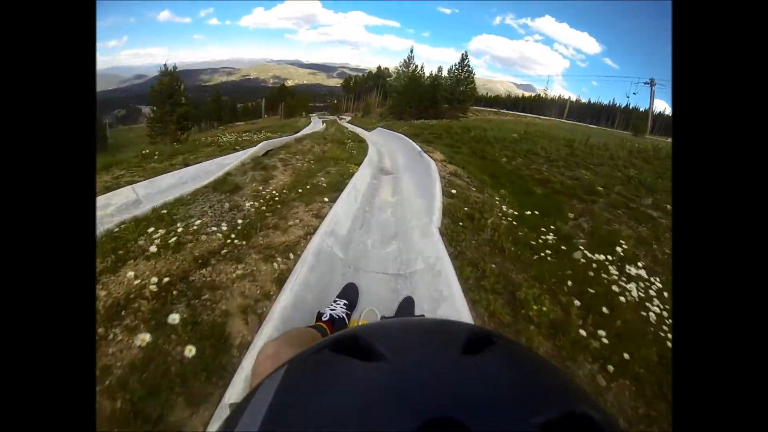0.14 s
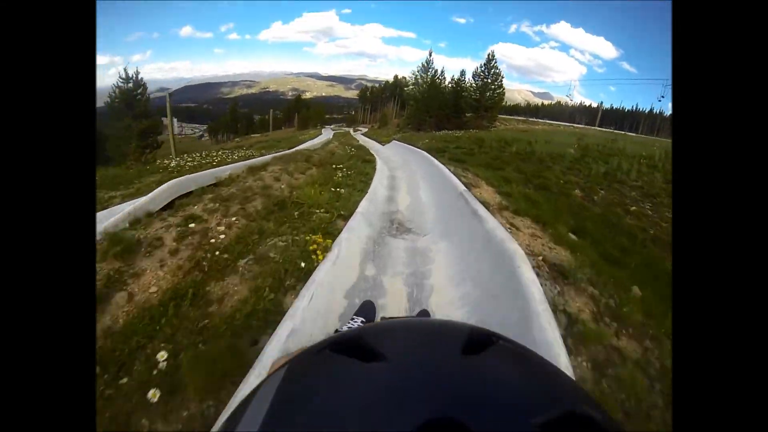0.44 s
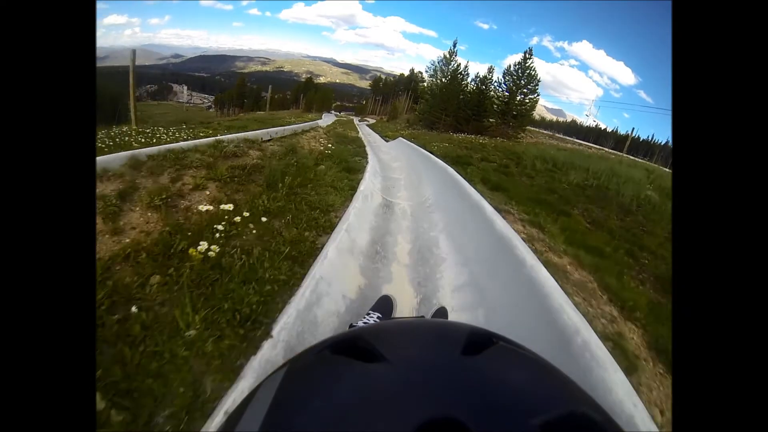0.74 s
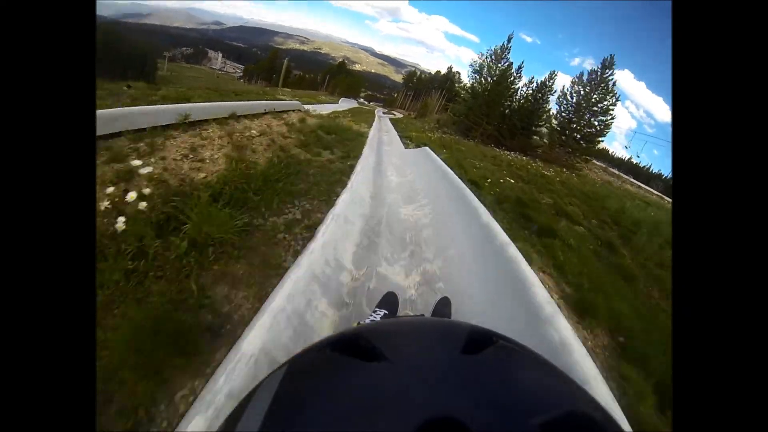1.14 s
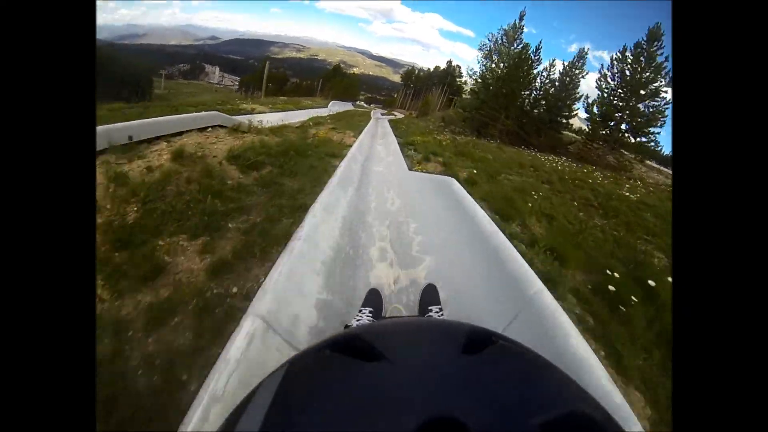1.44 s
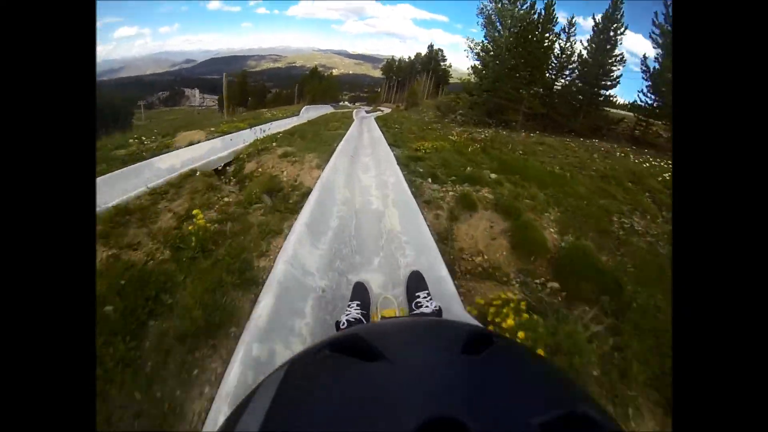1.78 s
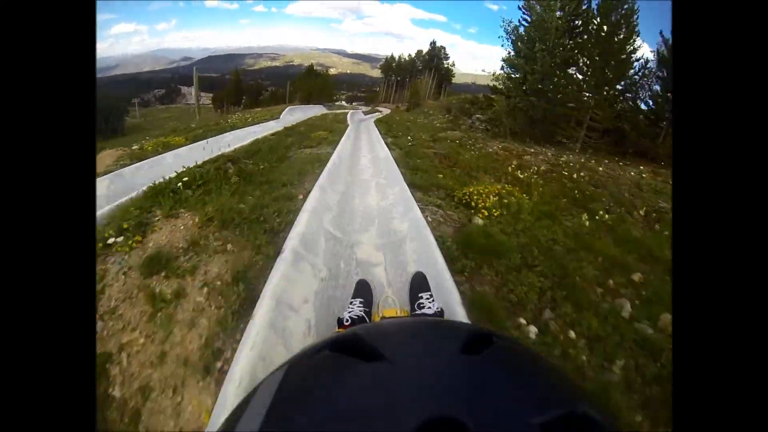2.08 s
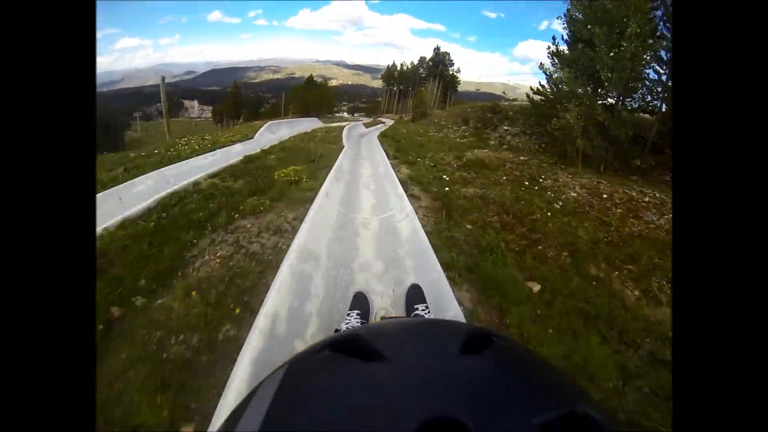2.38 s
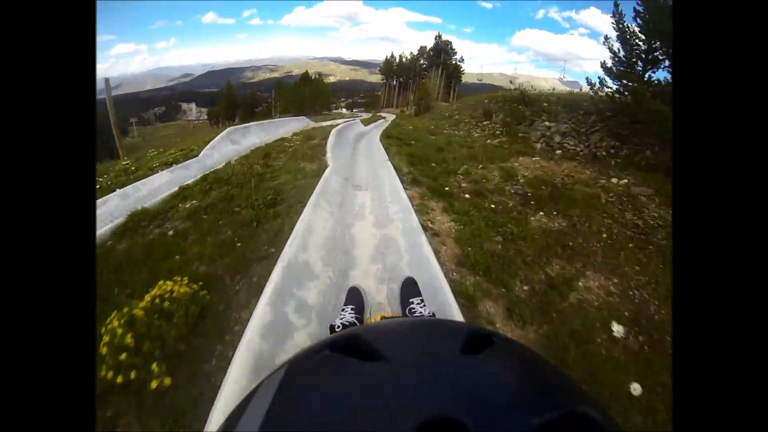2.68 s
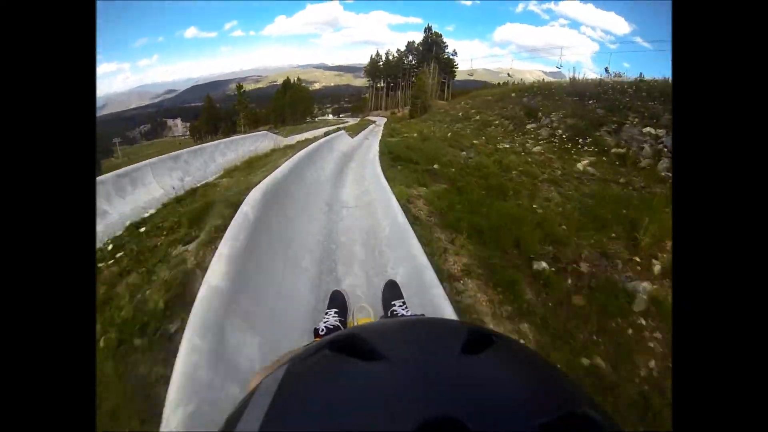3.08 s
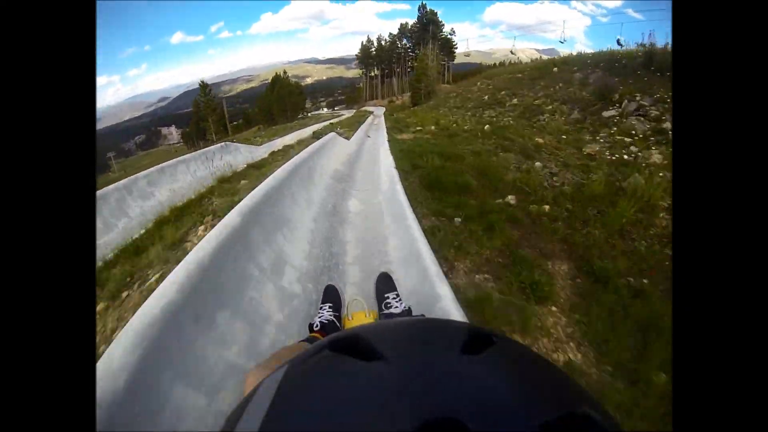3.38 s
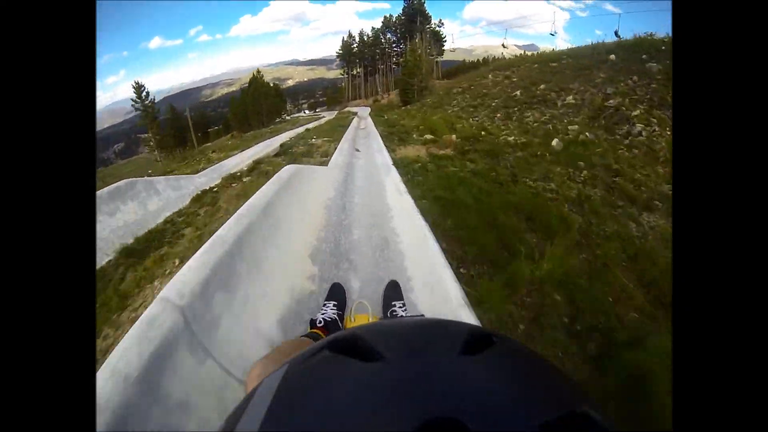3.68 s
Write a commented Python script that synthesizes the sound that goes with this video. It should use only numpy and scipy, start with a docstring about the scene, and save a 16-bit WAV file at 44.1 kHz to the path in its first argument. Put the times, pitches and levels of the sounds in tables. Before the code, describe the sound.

A wheeled sled rumbles along a concrete chute, with bumps and buffeting wind.

```python
"""A wheeled sled roars down a concrete chute on an open hillside, heard from the rider's helmet.
Grit under the wheels excites broadband rolling noise, and the uneven track shakes the shell into a rumble.
Impacts ring damped modes: bumps thump the shell, joints clack the chassis, loose fittings tick.
Wind buffets the microphone over a faint electrical whine.
Near the end something brushes along the banked wall with a short hiss."""
import sys
import numpy as np
from scipy import signal
from scipy.fft import rfft, irfft, next_fast_len
from scipy.io import wavfile
from scipy.ndimage import uniform_filter1d

SR = 44100
rng = np.random.default_rng(int(sys.argv[2]) if len(sys.argv) > 2 else 0)


def file_out(sig):
    """Save sig as 16-bit WAV at sys.argv[1]."""
    # one column per channel
    cols = np.atleast_2d(sig).T
    # limit, then scale
    lim = np.clip(cols, -1, 1)
    pcm = np.round(lim * 32767).astype(np.int16)
    wavfile.write(sys.argv[1], SR, pcm)


N = 168903
FLUTTER_HZ = 14   # bandwidth of the random level flutter in roar and rumble


def from_db(db):
    """Decibels to amplitude ratio."""
    return 10 ** (np.asarray(db) / 20)


def rms_one(x):
    """Normalisation to unit rms."""
    return x / np.sqrt(np.mean(x ** 2) + 1e-20)


def in_time(rows):
    """Linear interpolation of (time_s, value) rows at every sample."""
    time_s, value = np.transpose(rows)
    return np.interp(np.arange(N) / SR, time_s, value)


def coloured(x, spectrum):
    """Spectral shaping by (frequency_hz, density_db) rows, falling 12 dB an octave outside; unit rms."""
    hz, db = np.transpose(spectrum)
    size = next_fast_len(N)
    bin_hz = np.maximum(np.fft.rfftfreq(size, 1 / SR), 1)
    skirts = np.minimum(1, bin_hz / hz[0]) ** 2 * np.minimum(1, hz[-1] / bin_hz) ** 2
    gain = from_db(np.interp(np.log(bin_hz), np.log(hz), db))
    return rms_one(irfft(rfft(x, size) * skirts * gain, size)[:N])


def low_pass(x, hz, order=2):
    """Butterworth low-pass filter."""
    return signal.sosfilt(signal.butter(order, hz, fs=SR, output="sos"), x + 1e-18)


def band_below(x, hz):
    """Zero-phase low-pass: filtering forwards and backwards cancels the delay."""
    forwards = low_pass(x, hz, order=4)
    return low_pass(forwards[::-1], hz, order=4)[::-1]


def drift(hz):
    """Slow random fluctuation: low-passed noise of unit rms."""
    pole = np.exp(-2 * np.pi * hz / SR)
    return rms_one(signal.lfilter([1], [1, -2 * pole, pole * pole], rng.standard_normal(N + SR))[SR:])


def ring(x, hz, t60_s):
    """Damped resonator: a unit impulse starts a decaying sine of amplitude 1."""
    radius, angle = np.exp(-np.log(1000) / (t60_s * SR)), 2 * np.pi * hz / SR
    return signal.lfilter([0, np.sin(angle)], [1, -2 * radius * np.cos(angle), radius ** 2], x + 1e-18)


def modal_response(force, modes):
    """Superposition of damped modes (pitch_hz, level_db, t60_s), alternating in sign."""
    return sum(from_db(db) * ring(force, hz, t60_s) * (-1) ** k for k, (hz, db, t60_s) in enumerate(modes))


def evened(x, span_s):
    """Division by the running rms takes the slow swings out of a noise."""
    return x / np.sqrt(uniform_filter1d(x ** 2, int(span_s * SR)) + 1e-6)


def add(out, start_s, x):
    """Superpose a short sound at its start time."""
    i = int(start_s * SR)
    out[i:i + len(x)] += x[:N - i]


def whine():
    """Amplitude modulation: a thin electrical tone and its octave flutter evenly as their phase wanders."""
    # pitch_hz, level_db
    partials = [(6435, -92.5), (12870, -102)]
    depth, rate_hz = 0.94, 50
    t = np.arange(N) / SR
    flutter = 1 + depth * np.sin(2 * np.pi * rate_hz * t)
    wander = 1.3 * drift(hz=40)
    return flutter * sum(from_db(db) * np.sin(2 * np.pi * hz * t + wander) for hz, db in partials)


def wall_brush():
    """Friction noise: a light sliding contact bites in and hisses for about a quarter of a second."""
    # envelope of the contact: time_s, level_db
    envelope = [(3.40, -85), (3.47, -66), (3.533, -70), (3.541, -57), (3.64, -59.5), (3.745, -60),
                (3.785, -67), (3.82, -80)]
    # spectrum of the hiss: frequency_hz, density_db
    spectrum = [(1500, -8.5), (2800, 0), (3900, -2.5), (4900, -0.5), (6300, -6), (7500, -12.5), (8700, -21),
                (10500, -36.5), (13000, -41.5)]
    gain_db, flutter_db = -3.5, 0.7
    level_db = gain_db + in_time(envelope) + flutter_db * drift(hz=40)
    return from_db(level_db) * coloured(rng.standard_normal(N), spectrum)


def wind_buffeting():
    """Turbulence: the pressure of passing eddies throbs on the microphone."""
    # envelope of the gusts: time_s, level_db
    gusts = [(0.0, -35), (0.29, -30.5), (0.33, -29), (0.56, -31), (0.63, -35.5), (0.70, -27), (0.79, -27.5),
             (0.85, -37.5), (0.98, -34.5), (1.16, -29.5), (1.22, -35.5), (1.30, -25), (1.40, -32),
             (1.45, -36), (1.62, -33), (1.77, -35), (2.0, -33.5), (2.2, -35.5), (2.44, -30), (2.53, -24.5),
             (2.59, -31.5), (2.87, -35), (2.99, -26), (3.04, -32.5), (3.26, -39.5), (3.31, -27.5),
             (3.46, -35.5), (3.56, -25.5), (3.66, -31.5), (3.82, -31.5)]
    # spectrum of the eddies: frequency_hz, density_db
    spectrum = [(12, -7), (22, 6), (31, 2.5), (40, 6), (52, -10.5), (80, -27.5), (160, -43), (400, -60)]
    gain_db = 2
    eddies = evened(coloured(rng.standard_normal(N), spectrum), span_s=0.054)
    return from_db(gain_db + in_time(gusts)) * eddies


def fitting_ticks():
    """Impact and chatter: a loose fitting gives a heavily damped crack and rings the nearest modes."""
    # ticks: start_s, level_db, main_pitch_hz, chatter_decay_s, crack_relative_db
    ticks = [(0.194, -52, 5300, .003, 1), (0.338, -50, 3500, .004, -6.5), (0.350, -55, 6500, .006, 0),
             (0.4625, -35, 2190, 0.0022, -1), (0.4645, -52, 4700, 0.0034, -1),
             (0.590, -50.5, 3600, .003, 0), (0.611, -52, 6000, .004, 0), (0.619, -52, 2970, 0.0066, 1),
             (0.702, -54, 6900, .008, 3), (1.502, -49, 3250, .0015, -11), (1.523, -55, 5000, .001, -12),
             (1.526, -40.5, 5400, 0.00087, -20), (1.528, -49, 3250, .0015, -10),
             (2.159, -55, 3500, .003, 4), (2.820, -41.5, 2600, 0.0036, 3.5),
             (3.280, -43.5, 4380, 0.0064, 0), (3.327, -54, 3500, .012, 0), (3.369, -50, 4400, 0.0065, 2),
             (3.375, -56.5, 3700, .001, -3)]
    # modes of the fittings: pitch_hz, level_db, t60_s
    modes = [(2080, 0, .015), (2440, 2, 0.014), (3270, -2.5, .015), (3700, -5.5, 0.013), (4920, -9, 0.0091),
             (5400, -9.5, 0.011), (5800, -13, 0.009), (6500, -22, 0.0092), (8400, -10, .009)]
    chatter_share, crack_cycles = 0.31, 5   # share of the contact's energy; periods to decay by 60 dB
    slope_db_per_octave = 16.5   # modes away from the main pitch ring less
    out, t = np.zeros(N), np.arange(SR // 10) / SR
    for start_s, level_db, main_hz, decay_s, crack_db in ticks:
        chatter = rng.standard_normal(len(t)) * np.exp(-t / decay_s)
        chatter /= np.linalg.norm(chatter)
        contact = np.sqrt(chatter_share) * chatter + np.sqrt(1 - chatter_share) * (t == 0)
        crack = from_db(crack_db) * ring(contact, main_hz, crack_cycles / main_hz)
        excited = [(hz, db - slope_db_per_octave * abs(np.log2(hz / main_hz)), t60_s)
                   for hz, db, t60_s in modes]
        add(out, start_s, from_db(level_db) * (crack + modal_response(contact, excited)))
    return low_pass(out, hz=6500)


def joint_clacks():
    """Impulse response: the wheels strike joints in the track and the chassis rings freely."""
    # strikes on the joints: start_s, level_db
    strikes = [(0.4635, -42), (0.619, -36), (0.624, -43), (3.280, -38.5), (3.2828, -30), (3.2885, -39),
               (3.325, -35)]
    # modes of the chassis: pitch_hz, level_db, t60_s
    modes = [(563, -8.5, .012), (832, -5, 0.042), (1368, -3, 0.033), (1540, -11, 0.013),
             (2040, -16.5, 0.021)]
    force, pulse = np.zeros(N), low_pass(signal.unit_impulse(SR // 100), hz=3500)
    for start_s, level_db in strikes:
        add(force, start_s, from_db(level_db) * pulse)
    return modal_response(force, modes)


def bump_thumps():
    """Impact excitation: each bump thuds and rings the shell; a harder contact has a wider spectrum."""
    # drops over bumps and joints: start_s, level_db, contact_cutoff_hz
    bumps = [(0.189, -33, 400), (0.616, -25, 600), (0.666, -26, 450), (0.708, -27, 350),
             (1.055, -28.5, 350), (1.227, -27, 350), (1.326, -27, 350), (1.358, -30, 350),
             (1.451, -28.5, 400), (1.707, -23.5, 400), (1.831, -21.5, 400), (1.925, -31, 129),
             (2.18, -22, 140), (2.397, -22, 218), (2.661, -29.5, 400), (2.779, -29.5, 400),
             (3.320, -25.5, 500), (3.336, -24.5, 200), (3.478, -26.5, 283), (3.628, -25, 140),
             (3.643, -26.5, 300), (3.657, -33, 400)]
    # modes of the shell: pitch_hz, level_db, t60_s
    modes = [(86, -9.5, 0.02), (136, -5, 0.055), (199, -5.5, 0.036), (241.6, 0, 0.049), (300, -11.5, 0.067),
             (444, -16, 0.035)]
    force, impulse = np.zeros(N), signal.unit_impulse(SR // 20)
    for start_s, level_db, cutoff_hz in bumps:
        add(force, start_s, from_db(level_db) * low_pass(impulse, cutoff_hz))
    thud = from_db(3) * ring(force, hz=170, t60_s=0.014)
    return thud + modal_response(force, modes)


def shell_rumble():
    """Forced vibration: the uneven track shakes the shell in lumps."""
    # envelope of the shaking: time_s, level_db
    envelope = [(0.0, -39.5), (0.29, -44.5), (0.41, -38), (0.69, -43.5), (0.81, -51), (1.02, -50),
                (1.16, -43.5), (1.34, -45.5), (1.55, -43.5), (1.69, -33.5), (1.78, -37.5), (1.92, -35.5),
                (2.05, -42), (2.19, -34.5), (2.41, -36.5), (2.52, -39.5), (2.93, -35), (3.02, -39.5),
                (3.18, -38), (3.28, -40.5), (3.5, -37.5), (3.58, -41), (3.66, -35.5), (3.72, -39.5),
                (3.82, -43)]
    # spectrum of the rumble: frequency_hz, density_db
    spectrum = [(35, -7), (60, 4.5), (120, 2.5), (180, -1), (270, -4.5), (380, -9.5), (520, -18),
                (800, -33)]
    gain_db, flutter_db = 1.5, 1.2
    vibration = coloured(rng.standard_normal(N), spectrum)
    lumps = from_db(flutter_db * drift(FLUTTER_HZ))
    return from_db(gain_db + in_time(envelope)) * evened(vibration * lumps, span_s=0.16)


def grit_contact():
    """Shot noise: grains of random size strike the wheels, over smooth Gaussian noise."""
    grains_per_s, spread_db, power_share = 4000, 4, 0.36
    sizes = from_db(spread_db * np.minimum(rng.exponential(1, N), 4)) * rng.choice([-1, 1], N)
    grains = rms_one(sizes * (rng.random(N) < grains_per_s / SR))
    return np.sqrt(power_share) * grains + np.sqrt(1 - power_share) * rng.standard_normal(N)


def wheel_roar():
    """Rolling noise: grit drives a broad roar, joined by faint narrow bands; load fills the low end."""
    # envelope of the roar: time_s, level_db
    envelope = [(0.0, -52), (0.22, -47.5), (0.33, -49), (0.47, -46.5), (0.66, -48), (0.76, -49.5),
                (0.81, -56.5), (1.03, -53.5), (1.16, -50.5), (1.35, -52), (1.45, -47), (1.65, -43.5),
                (2.04, -45), (2.14, -41.5), (2.42, -42.5), (2.62, -44.5), (2.94, -43), (3.0, -51),
                (3.16, -46), (3.26, -50), (3.38, -48.5), (3.52, -45), (3.63, -50.5), (3.73, -46.5),
                (3.82, -48)]
    # spectrum of the roar: frequency_hz, density_db
    spectrum = [(250, -7), (450, -1.5), (620, -6), (850, -1.5), (1200, 1.5), (1600, 1), (1780, -6.5),
                (1950, -13), (2350, -16.5), (2650, -24.5), (3400, -27), (4300, -40), (5200, -36.5),
                (5900, -46), (6800, -45), (8000, -54.5), (13000, -61)]
    # two faint rings of the running gear, and a thin noisy band of the electrical whine:
    # pitch_hz, bandwidth_hz, relative_db
    narrow_bands = [(739.6, 13, -17.5), (1170, 65, -17.5), (6430, 99, -51)]
    gain_db, flutter_db = 1, 1
    low_follows, high_follows = 0.95, 0.44   # shares of the level swing in bass and treble
    roar = evened(coloured(grit_contact(), spectrum), span_s=0.092)
    for hz, bandwidth_hz, db in narrow_bands:
        t60_s = np.log(1000) / (np.pi * bandwidth_hz)
        roar += from_db(db) * rms_one(ring(rng.standard_normal(N), hz, t60_s))
    low, low_and_mid = band_below(roar, hz=1080), band_below(roar, hz=2460)
    level_db = in_time(envelope)
    swing_db = level_db - level_db.mean()
    loaded = (from_db(low_follows * swing_db) * low
              + from_db(swing_db) * (low_and_mid - low)
              + from_db(high_follows * swing_db) * (roar - low_and_mid))
    return from_db(gain_db + level_db.mean() + flutter_db * drift(FLUTTER_HZ)) * loaded


def scene():
    """Free-field superposition: the sources travel with the listener and add without echo."""
    continuous = wheel_roar() + shell_rumble() + wind_buffeting()
    impacts = bump_thumps() + joint_clacks() + fitting_ticks()
    return (continuous + impacts + whine() + wall_brush())[None]


def record(dry):
    """Band limiting: a steep low-pass cuts the top after a short fade in."""
    fade_s, stopband_hz = 0.008, 15500
    fade = np.sin(np.pi / 2 * np.minimum(np.arange(N) / SR / fade_s, 1)) ** 2
    return signal.sosfilt(signal.cheby2(12, 70, stopband_hz, fs=SR, output="sos"), dry * fade)


dry = scene()
out = record(dry)
file_out(out)
```